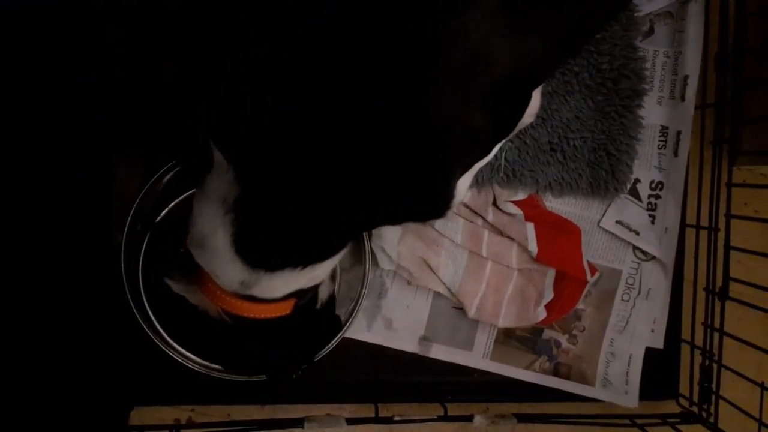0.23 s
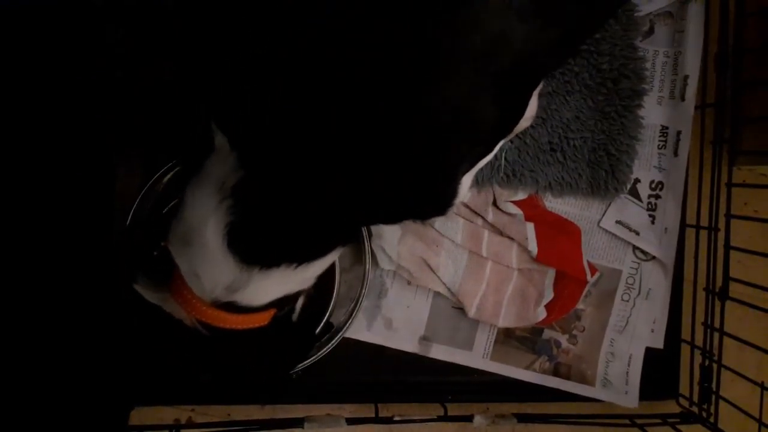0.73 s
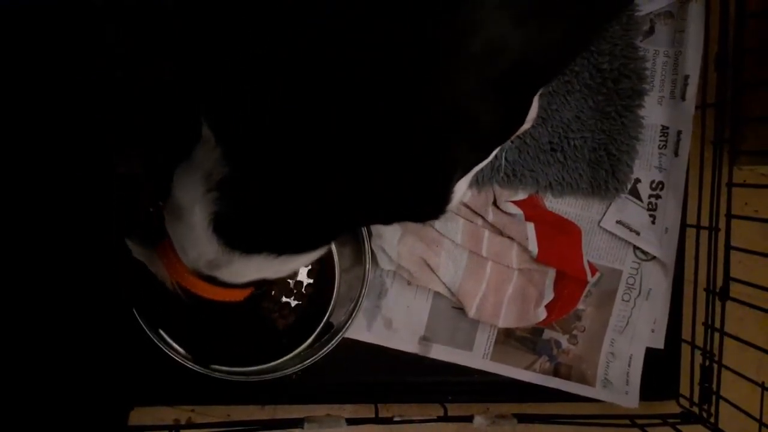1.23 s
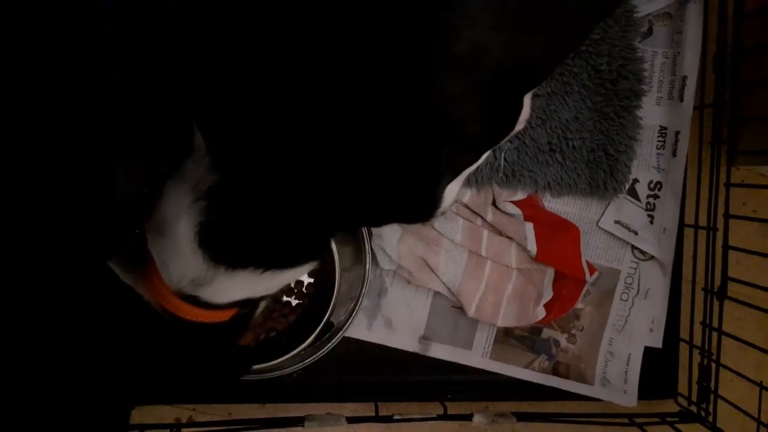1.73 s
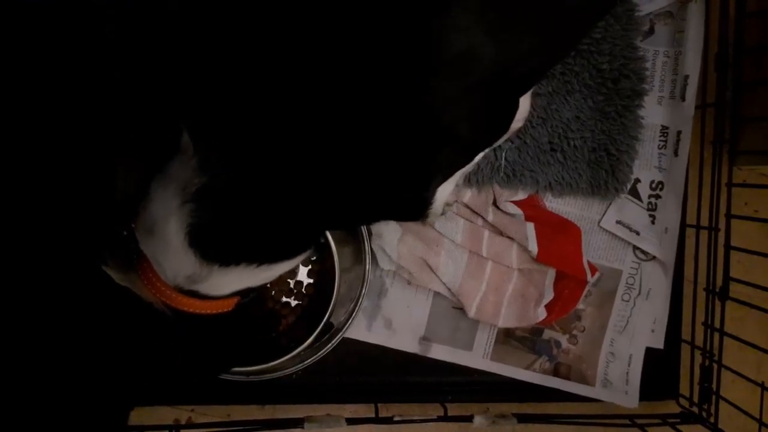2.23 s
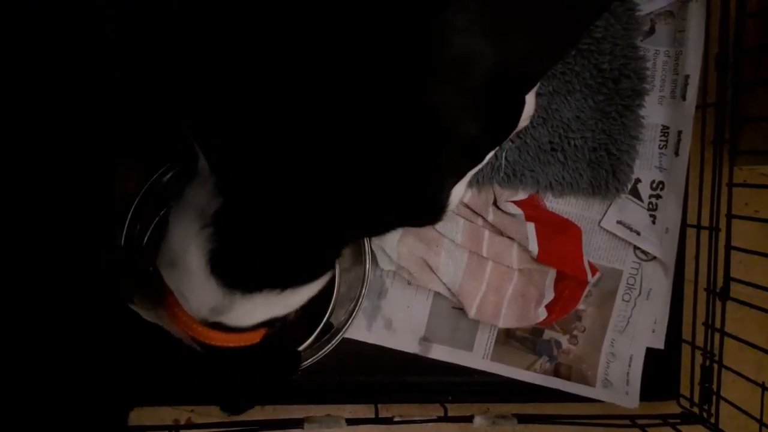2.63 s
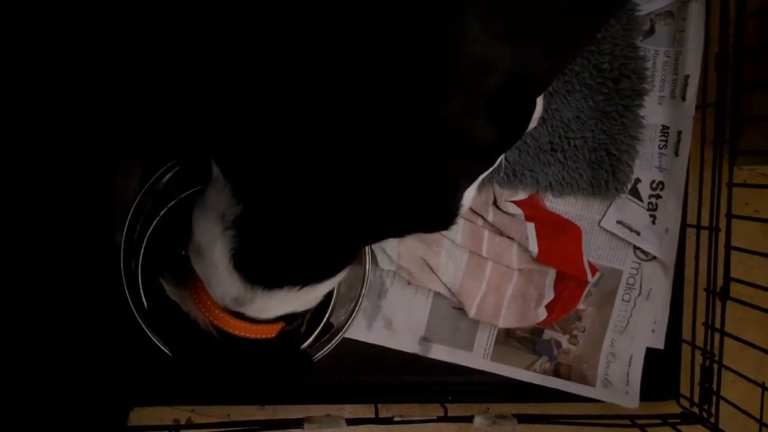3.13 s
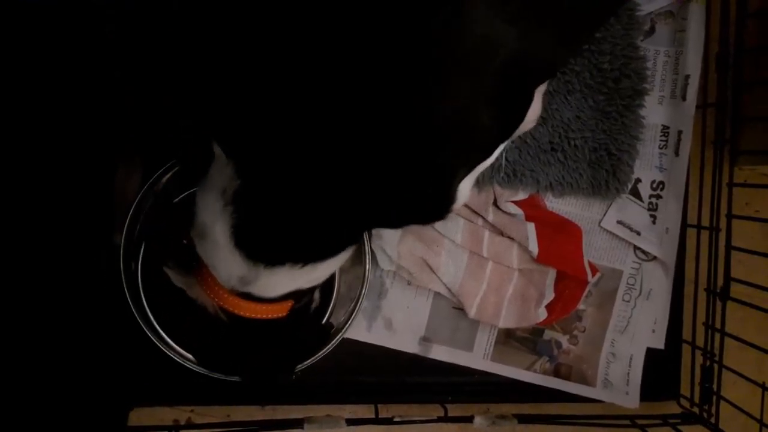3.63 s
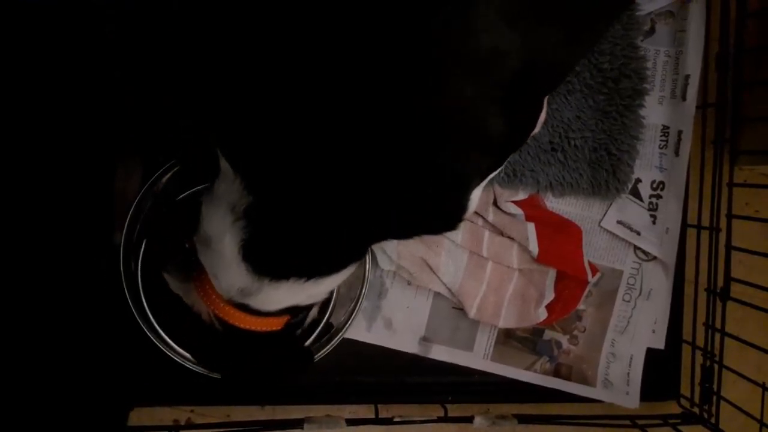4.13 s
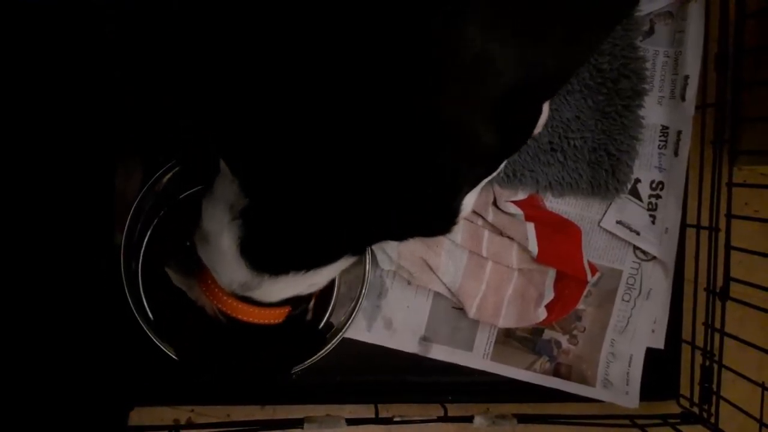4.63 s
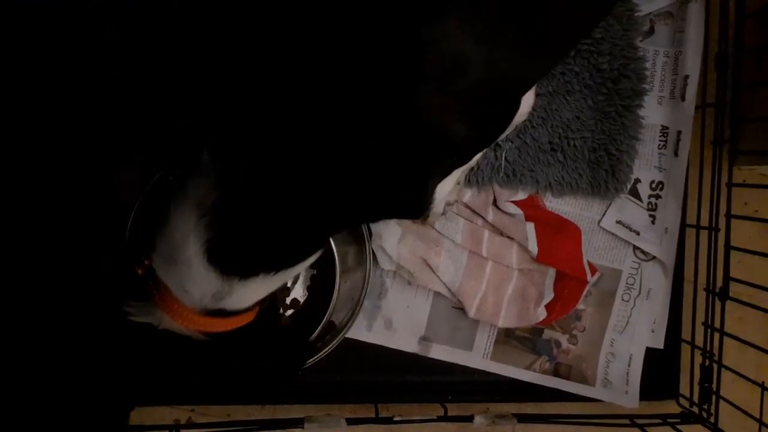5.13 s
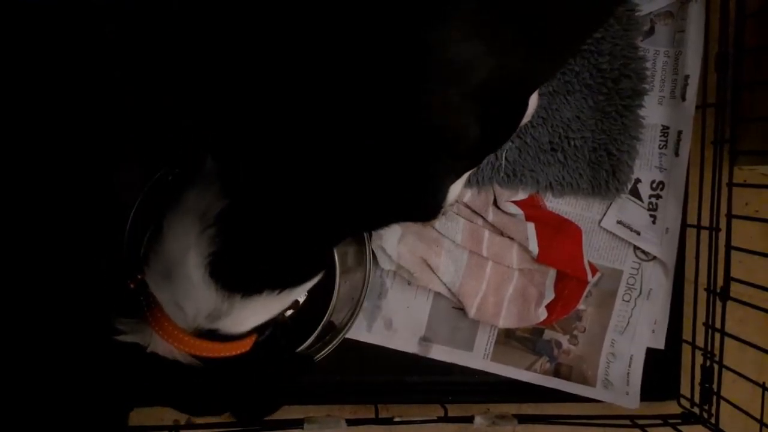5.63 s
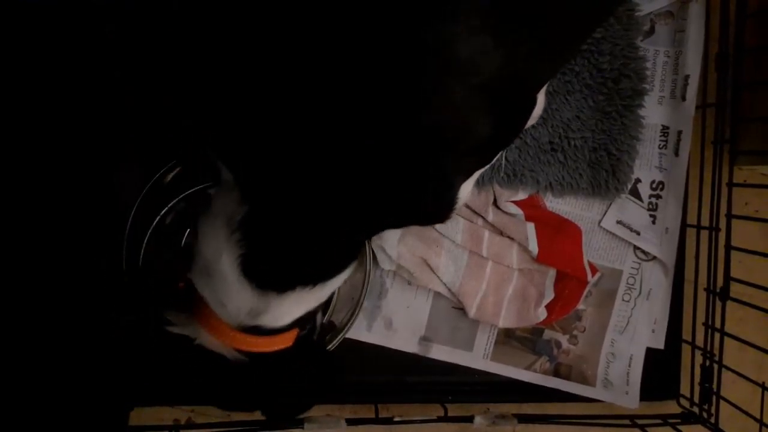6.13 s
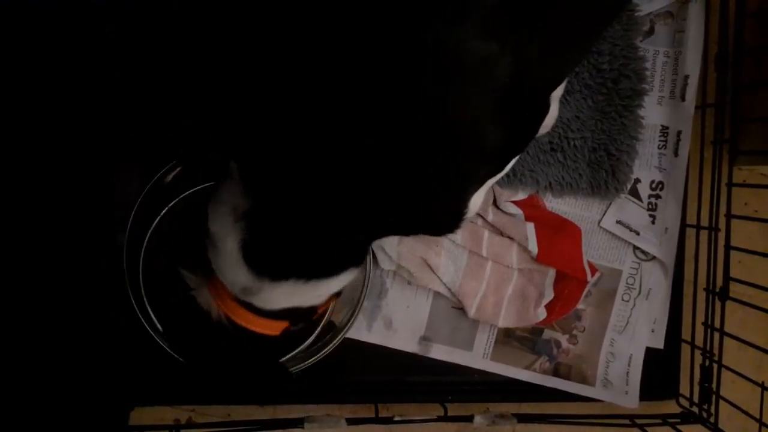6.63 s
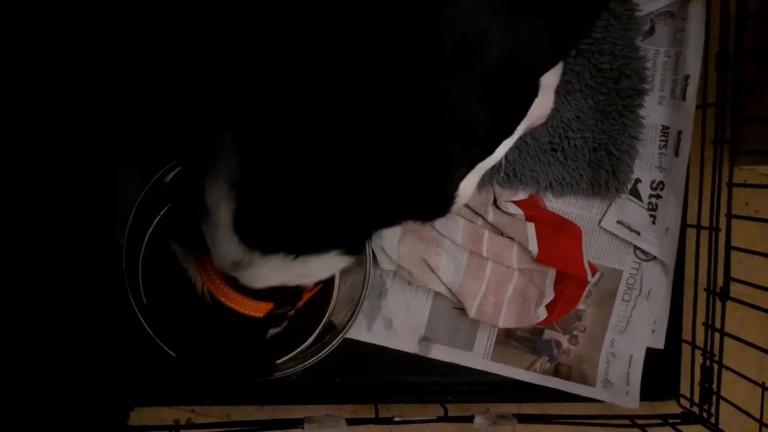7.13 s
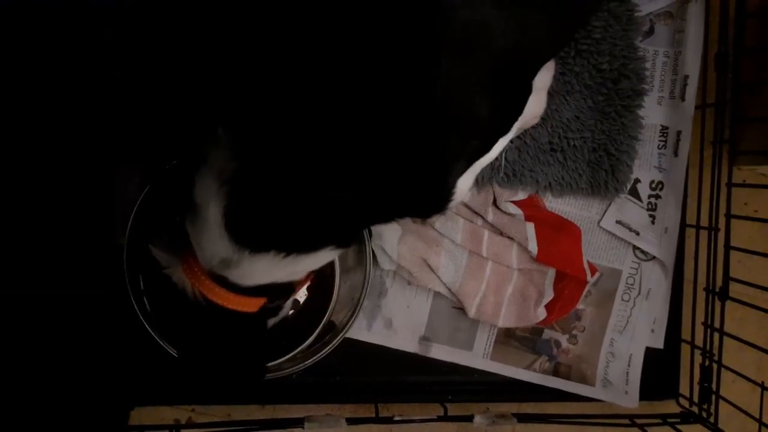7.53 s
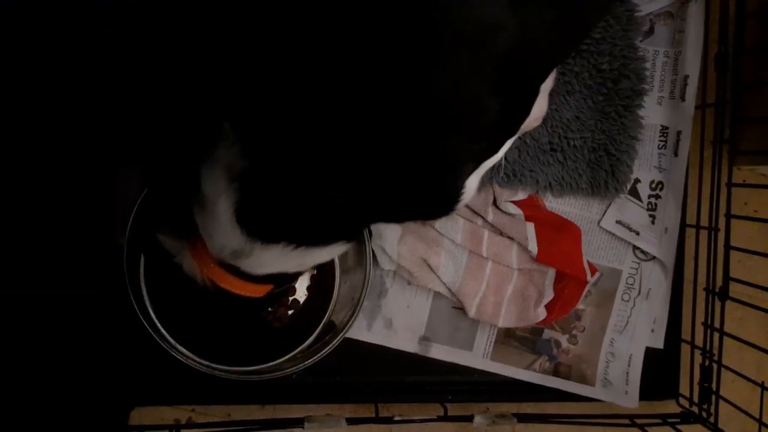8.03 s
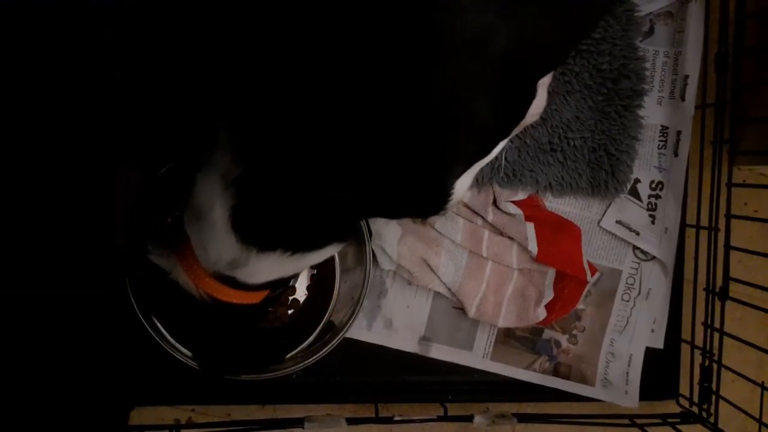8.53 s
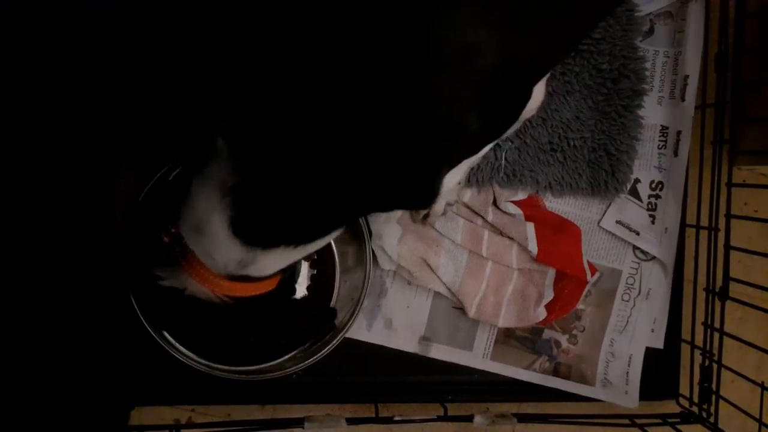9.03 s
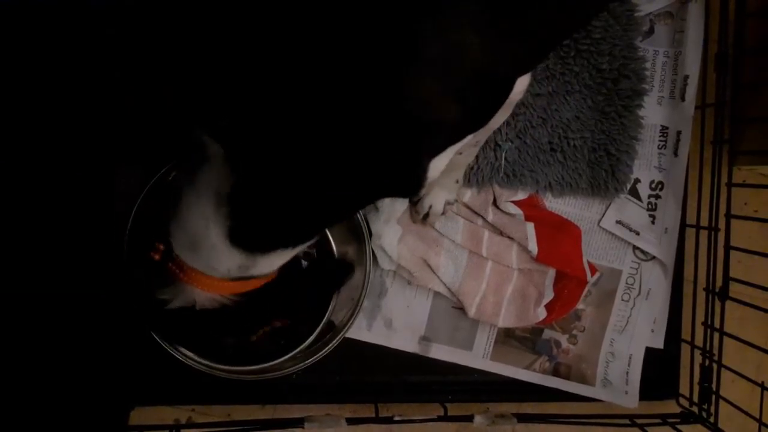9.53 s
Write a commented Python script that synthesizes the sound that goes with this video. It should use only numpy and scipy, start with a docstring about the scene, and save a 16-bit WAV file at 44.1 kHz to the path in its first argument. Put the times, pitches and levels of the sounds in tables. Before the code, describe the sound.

A dog eats kibble from a steel bowl, with wet smacks, licks, crunchy clacks and soft metallic thumps in a small quiet room.

```python
"""In a small live room, a dog in a crate eats kibble from a stainless steel bowl.
Tongue and jaw work in short strokes: lips pop as ringing sines and food squelches as band-passed noise.
Kibble clacks and skitters over the steel, and the nudged bowl booms softly at its lowest modes.
These contacts are clicks sent through coloured, ringing echoes; the hardest bites stand out of the patter.
A faint steady hush of shaped noise lies behind."""
import sys
import numpy as np
from scipy import signal
from scipy.fft import rfft, irfft, next_fast_len
from scipy.io import wavfile
from scipy.ndimage import uniform_filter1d

SR = 44100
rng = np.random.default_rng(int(sys.argv[2]) if len(sys.argv) > 2 else 0)


def wrap_up_sound(samples):
    """Save the sound to the file named by the first command line argument, as 16-bit audio."""
    columns = np.atleast_2d(samples).T
    # keep every value between -1 and 1, then stretch to whole-number steps
    tamed = np.clip(columns, -1, 1)
    steps = np.round(tamed * 32767).astype(np.int16)
    wavfile.write(sys.argv[1], SR, steps)


N = 430857
TIME = np.arange(N) / SR  # seconds
RESPONSE_SIZE = 16384  # samples

# strokes of tongue and jaw, levels relative within each layer: start_s, length_s, bowl_push_db, tongue_db,
# mouth_cavity_hz, stirred_kibble_db, steel_skitter_db
STROKE_TABLE = [(0.0, 0.075, -56, -46.5, 690, -51, -55.5), (0.061, .05, -52.5, -42, 760, -42, -43.5),
                (0.168, 0.12, -53, -55, 726, -52.5, -52), (0.377, .15, -42, -41.5, 653, -42, -44),
                (0.727, 0.097, -44, -42, 700, -45.5, -49.5), (1.06, 0.093, -65, -48, 676, -53, -62),
                (1.17, 0.071, -61, -50, 1080, -60.5, -75), (1.401, 0.18, -50, -44, 654, -47, -56.5),
                (1.524, 0.074, -42, -35, 856, -39, -46), (1.727, 0.17, -42, -62, 670, -59.5, -80),
                (1.98, 0.048, -41.5, -49, 696, -67, -92.5), (2.13, 0.15, -51, -46, 1000, -56.5, -59.5),
                (2.3, .1, -46, -54, 870, -60, -82), (2.483, 0.2, -40, -71, 540, -87.5, -94),
                (2.791, .11, -52, -42.5, 820, -53, -81), (2.915, .13, -51.5, -44.5, 810, -44.5, -51),
                (3.16, 0.18, -59, -46.5, 720, -52.5, -58.5), (3.515, 0.16, -56, -38, 750, -46, -48),
                (3.701, .05, -59, -48, 674, -57, -78), (3.803, 0.066, -56, -40, 735, -49.5, -49.5),
                (3.917, .13, -57, -43, 690, -45.5, -50), (4.135, 0.069, -50, -38, 730, -39, -42.5),
                (4.332, 0.031, -81.5, -51.5, 727, -62, -84), (4.471, 0.099, -46.5, -44.5, 697, -45.5, -50),
                (4.63, 0.057, -75, -58.5, 734, -59, -73.5), (4.841, 0.16, -58, -46, 800, -44, -44.5),
                (5.091, 0.12, -46, -50.5, 744, -60.5, -59.5), (5.597, 0.21, -71, -48, 737, -47.5, -57.5),
                (5.678, 0.17, -39, -35, 875, -36, -44), (6.022, 0.2, -83, -56, 780, -61, -56.5),
                (6.129, 0.12, -51, -35.5, 715, -40.5, -46), (6.396, 0.061, -61, -51, 720, -51.5, -68.5),
                (6.551, 0.19, -59, -50, 774, -65, -80), (6.627, 0.22, -42.5, -39, 710, -44, -44),
                (6.894, 0.14, -40, -36, 645, -38, -45), (7.052, 0.032, -30, -36, 710, -38, -44.5),
                (7.2, 0.14, -34, -33.5, 650, -43.5, -48), (7.392, 0.02, -41.5, -39, 670, -38.5, -42),
                (7.565, 0.14, -46.5, -44, 610, -41, -46), (7.744, 0.097, -66, -49.5, 670, -63, -71),
                (7.913, 0.22, -49, -42, 684, -47.5, -50), (8.238, 0.082, -47.5, -42, 710, -50.5, -51.5),
                (8.298, 0.14, -54, -45, 604, -47.5, -52), (8.571, 0.15, -46, -33.5, 690, -38, -39),
                (8.811, 0.14, -41, -44, 690, -45.5, -52), (8.877, 0.16, -43, -36, 700, -37, -33),
                (9.144, 0.19, -38.5, -36.5, 790, -42, -47), (9.234, 0.18, -36.5, -35.5, 690, -41, -34),
                (9.502, 0.079, -34, -31, 716, -36.5, -38), (9.554, 0.077, -35, -48, 750, -36, -41),
                (9.712, .05, -43.5, -49, 727, -56, -45.5)]
# between strokes the muzzle never quite rests
IDLE_PUSH_DB, IDLE_TONGUE_DB, IDLE_STIR_DB, IDLE_SKITTER_DB = -71.5, -68, -77.5, -87.5


def mouth(times, pop_db, tongue_db, scatter=0.18, gain_db=-15.0):
    """Loud smacks at the bites, and a patter of small pops around the cavity's pitch between them."""
    # colour of the pops: point_hz, relative_level_db
    pop_colour = [(150, -32.5), (350, -10.5), (470, 2), (620, 3), (950, 0.5), (1300, 1), (1700, -7),
                  (3000, -63), (8000, -61)]
    licking = effort(tongue_db, IDLE_TONGUE_DB, crest_share=0.19, swell_db=-2, ease_db=6,
                     release_db_per_s=281)
    patter = licking * grains(per_s=150, spread_db=1.5, steady_s=.04)
    pops = np.zeros(N)
    for s, db in zip(times, pop_db):
        add(pops, s, from_db(db) * pop(cavity_hz(s), cycles=1.0))
    pitches_hz = cavity_hz(TIME) * np.exp(scatter * rng.standard_normal(N))
    for i in np.flatnonzero(patter):
        add(pops, i / SR, patter[i] * pop(pitches_hz[i], cycles=2.0))
    heard = radiate(pops, pop_colour, t60=0.24, early_s=0.0054, early_share=0.35, pan_db=2.5)
    return from_db(gain_db) * heard


def pop(pitch_hz, cycles):
    """A wet seal breaks and the mouth cavity rings for a moment, fading by 1/e in this many cycles."""
    t = np.arange(SR // 50) / SR
    ring = np.sin(2 * np.pi * pitch_hz * t)
    return unit_energy(ring * np.exp(-t * pitch_hz / cycles))


def cavity_hz(s):
    """Pitch of the mouth cavity, which changes shape from the middle of one stroke to the next."""
    start, length, _, _, hz, _, _ = np.transpose(STROKE_TABLE)
    return np.interp(s, start + length / 2, hz)


def jaws(width_share=0.37):
    """Food is squeezed in the closing mouth: a short wet rush, pitched by the pocket it escapes from."""
    # gulps, squelches and fizzing saliva: start_s, level_db, pitch_hz, fade_s (to 1/e)
    squelch_table = [(1.074, -48.5, 2100, 0.04), (1.2, -54, 1300, 0.03), (1.54, -36.5, 12900, 0.02),
                     (1.548, -28, 1230, 0.031), (1.784, -43, 280, 0.12), (2.118, -47, 1810, 0.093),
                     (2.557, -44, 239, 0.046), (2.753, -36.5, 1800, 0.045), (2.754, -39.5, 2370, 0.042),
                     (4.176, -43, 10800, 0.025), (4.67, -50.5, 740, 0.072), (5.22, -43.5, 714, 0.013),
                     (5.575, -47.5, 720, 0.099), (5.74, -39.5, 12500, 0.02), (5.746, -33.5, 273, 0.16),
                     (6.084, -37.5, 930, .025), (6.18, -34, 2060, 0.034), (6.215, -26.5, 251, 0.031),
                     (6.257, -24, 210, 0.011), (9.569, -46, 13400, 0.019)]
    t = np.arange(SR // 5) / SR
    out = np.zeros(N)
    for s, db, hz, fade_s in squelch_table:
        edges_hz = hz * np.exp([-width_share / 2, width_share / 2])
        cavity = signal.butter(2, edges_hz, "band", fs=SR, output="sos")
        fade = np.exp(-t / fade_s)
        rush = signal.sosfilt(cavity, rng.standard_normal(len(t)) * fade)
        # a longer fade carries more energy
        add(out, s, from_db(db) * unit_energy(rush) * np.linalg.norm(fade))
    echoes = room(t60=0.25, early_s=0.0032, early_share=0.97)
    return signal.oaconvolve(out[None], echoes, axes=1)[:, :N]


def kibble(times, clack_db, stir_db):
    """Pellets knock on each other and crack between teeth."""
    # colour of the clacks: point_hz, relative_level_db
    clack_colour = [(500, -32.5), (1000, -3.5), (1400, 7.5), (2000, 1.5), (3000, 1), (3900, -7),
                    (5200, -24), (9000, -16.5), (15500, -30.5)]
    stirring = effort(stir_db, IDLE_STIR_DB, crest_share=0.26, swell_db=8, ease_db=7.5,
                      release_db_per_s=378)
    force = stirring * grains(per_s=220, spread_db=5.5, steady_s=.045)
    force += blows(times, clack_db, chatter_s=0.004, first_share=.55)
    return radiate(force, clack_colour, t60=0.24, early_s=0.011, early_share=0.34, pan_db=-1.5)


def steel(times, clink_db, skitter_db):
    """Hard pellets strike and skitter over the bare metal."""
    # colour of the clinks: point_hz, relative_level_db
    clink_colour = [(1500, -30.5), (3000, -7), (3800, 0), (5100, 2), (5700, 3), (6300, -1.5), (7300, -6),
                    (8100, -2), (8900, -3.5), (10100, -18), (12500, -17), (15700, -23.5)]
    skittering = effort(skitter_db, IDLE_SKITTER_DB, crest_share=.3, swell_db=6, ease_db=10,
                        release_db_per_s=497)
    force = skittering * grains(per_s=300, spread_db=6, steady_s=0.083)
    force += blows(times, clink_db, chatter_s=0.0026, first_share=0.36)
    return radiate(force, clink_colour, t60=0.2, early_s=0.0065, early_share=0.23, pan_db=-0.9)


def bowl_thumps(times, thump_db, push_db):
    """The bowl is knocked and judders over the floor."""
    # colour of the thumps: point_hz, relative_level_db
    thump_colour = [(30, -30.5), (60, -23.5), (100, -15), (150, -17), (215, -12), (320, -0.5), (430, -2),
                    (520, -14), (800, -33), (2000, -73)]
    push = effort(push_db, IDLE_PUSH_DB, crest_share=0.7, swell_db=6, ease_db=8.5,
                  release_db_per_s=260)
    force = push * grains(per_s=260, spread_db=0, steady_s=0.017)
    force += blows(times, thump_db, chatter_s=0.0092, first_share=0.96)
    return radiate(force, thump_colour, t60=0.24, early_s=0.0083, early_share=0.55, pan_db=0.55)


def effort(levels_db, idle_db, crest_share, swell_db, ease_db, release_db_per_s, attack_db_per_s=1500):
    """Every stroke sets in quickly, slides to its crest level, eases off and dies away: a gain per sample."""
    gain = np.full(N, from_db(idle_db))
    lead_s, tail_s = .05, .3
    for (start, length, *_), db in zip(STROKE_TABLE, levels_db):
        crest_s = np.clip(crest_share, .05, .95) * length
        corners_s = [-lead_s, 0, crest_s, length, length + tail_s]
        # a negative swell_db sets in above the crest level
        lead_db = -swell_db - attack_db_per_s * lead_s
        tail_db = -ease_db - release_db_per_s * tail_s
        corners_db = [lead_db, -swell_db, 0, -ease_db, tail_db]
        t = TIME[(TIME > start - lead_s) & (TIME < start + length + tail_s)]
        add(gain, t[0], from_db(db + np.interp(t - start, corners_s, corners_db)))
    return gain


def grains(per_s, spread_db, steady_s):
    """Random tiny contacts of uneven size that share a steady supply of power."""
    at = np.flatnonzero(rng.random(N) < per_s / SR)
    sign, size = rng.standard_normal((len(at), 2)).T
    clicks = np.zeros(N)
    clicks[at] = np.sign(sign) * from_db(spread_db * size)
    power = uniform_filter1d(clicks ** 2, int(steady_s * SR))
    return clicks / np.sqrt(np.maximum(power, 1e-9))


def blows(times, levels_db, chatter_s, first_share):
    """Each blow is one firm contact and a dying chatter of small rebounds, which share its energy."""
    t = np.arange(SR // 20) / SR
    share = np.clip(first_share, 0, 1)
    force = np.zeros(N)
    for s, db in zip(times, levels_db):
        # cubing the noise lets a few rebounds stand out
        rebounds = rng.standard_normal(len(t)) ** 3 * np.exp(-t / chatter_s)
        burst = np.sqrt(1 - share) * unit_energy(rebounds)
        burst[0] = np.sqrt(share)
        add(force, s, from_db(db) * burst)
    return force


def radiate(force, colour, t60, early_s, early_share, pan_db, mode_spread_db=-0.5, own_paths=1.5,
            colour_spread_db=3.33, count=4):
    """Contacts land on changing spots of the bowl, each with its own mode strengths, colour and echoes."""
    # the bowl's modes: centre_hz, width_hz, level_db over the broad response, before each spot's variation
    bowl_modes = [(274.5, 27, 11), (325.7, 11.6, 15), (446, 9.1, 3), (535, 7.7, 4), (671, 13, 1),
                  (754, 5.9, 6.5), (1063, 10, 6), (1195, 19, 6), (1361, 43, 6.5), (2270, 17, 4),
                  (3100, 26, -4.5), (4095, 25, 6), (4440, 35, 4), (4674, 27, 11), (6130, 88, 3.5),
                  (6560, 38, 1.5), (7350, 19, -2.5)]
    hz = np.fft.rfftfreq(RESPONSE_SIZE, 1 / SR)
    centre_hz, width_hz, mode_db = np.transpose(bowl_modes)
    resonances = 1 / (1 + 2j * (hz - centre_hz[:, None]) / width_hz[:, None])
    shared = room(t60, early_s, early_share)
    stay = SR // 40  # samples before the spot is drawn anew
    spot = np.repeat(rng.integers(count, size=N // stay + 1), stay)[:N]
    out = np.zeros((2, N), np.float32)
    for k in range(count):
        varied_mode_db = mode_db + mode_spread_db * rng.standard_normal(len(bowl_modes))
        strengths = from_db(varied_mode_db) - 1
        modes = 1 + (strengths[:, None] * resonances).sum(axis=0)
        # pellets differ in size and hardness, so each spot sounds a little duller or brighter here and there
        points_hz, colour_db = np.transpose(colour)
        varied_db = colour_db + colour_spread_db * rng.standard_normal(len(colour))
        tone = causal(gain_at(np.c_[points_hz, varied_db], hz))
        echoes = shared + own_paths * room(t60, early_s, early_share)
        response = unit_energy(irfft(rfft(echoes) * tone * modes))
        contacts = np.float32(force * (spot == k))
        out += signal.oaconvolve(contacts[None], np.float32(response), axes=1)[:, :N]
    # positive pan_db leans left
    return out * from_db([[pan_db / 2], [-pan_db / 2]])


def room(t60, early_s, early_share, even_hz=24):
    """Echoes for left and right: a quick flurry from bowl and crate, then the room's tail."""
    t = np.arange(RESPONSE_SIZE) / SR
    early, late = rng.standard_normal((2, 2, RESPONSE_SIZE))
    share = np.clip(early_share, 0, 1)
    echoes = np.sqrt(share) * unit_energy(early * np.exp(-t / early_s))
    echoes += np.sqrt(1 - share) * unit_energy(late * from_db(-60 * t / t60))
    # the echoes are evened, so that no stretch of pitch is much favoured
    spectrum = rfft(echoes)
    power = uniform_filter1d(np.abs(spectrum) ** 2, int(2 * even_hz * RESPONSE_SIZE / SR))
    evened = irfft(spectrum / np.sqrt(power))
    # the end is silenced, as evening can wrap sound around to it
    return unit_energy(evened * (t < t[-1] * .85))


def causal(gain):
    """The minimum-phase filter with this gain: nothing sounds before the contact."""
    cepstrum = irfft(np.log(gain))
    cepstrum[1:RESPONSE_SIZE // 2] *= 2
    cepstrum[RESPONSE_SIZE // 2 + 1:] = 0
    return np.exp(rfft(cepstrum))


def air():
    """The still air of the room: a faint steady hush of noise, independent left and right."""
    # colour of the hush: point_hz, relative_level_db
    air_colour = [(20, -2.5), (120, 5), (300, 6.5), (700, -11), (1500, -3.5), (3000, -15.5), (14000, -12),
                  (16000, -17)]
    level_db = -67  # RMS
    size = next_fast_len(N)
    white = rfft(rng.standard_normal((2, size)))
    gain = gain_at(air_colour, np.fft.rfftfreq(size, 1 / SR))
    noise = irfft(white * gain, size)[:, :N]
    return from_db(level_db) * noise / noise.std()


def gain_at(spectrum, hz):
    """Gain of a spectrum, its decibels straight between its points on a log frequency axis."""
    points_hz, level_db = np.transpose(spectrum)
    return from_db(np.interp(np.log(hz + 1), np.log(points_hz), level_db))


def add(track, s, sound):
    """Mix a short sound in at a time in seconds."""
    start = max(int(s * SR), 0)
    track[start:start + len(sound)] += sound[:max(N - start, 0)]


def unit_energy(x):
    """Scale each channel to an energy of one."""
    return x / np.sqrt(np.sum(x ** 2, axis=-1, keepdims=True) + 1e-20)


def from_db(db):
    """Decibels to gain."""
    return np.exp(np.asarray(db) * (np.log(10) / 20))


def scene():
    """Strokes and bites drive mouth, food and bowl together."""
    # the hardest bites and knocks, levels relative within each layer: start_s, bowl_thump_db, mouth_pop_db,
    # kibble_clack_db, steel_clink_db
    bite_table = [(0.065, -15, -1.5, -9, -5.5), (0.084, -22, 0, -3.5, 10), (0.236, -22, -10.5, -16.5, -8.5),
                  (0.433, -21, 4.5, -10, -15), (0.469, 2.5, 8, -2.5, -13), (0.75, -5.5, -17.5, -32, -24),
                  (0.82, -7, -5, -16.5, -10), (0.96, -43, -24.5, -52, -40.5), (1.071, -46, -19, -30, -24),
                  (1.45, -29, -2.5, -11, -8.5), (1.479, -30, 2, -11.5, -22), (1.54, -18, 0.5, -5.5, -19),
                  (1.549, -3, 12, -3, 1), (1.575, -1, -2, -13, -10), (1.763, -12, -25.5, -22, -26.5),
                  (2.045, -16, -11.5, -36.5, -57.5), (2.243, -17, -5, -35, -46),
                  (2.365, -34, -15, -20.5, -26.5), (2.556, -5.5, -20, -38.5, -52),
                  (2.754, -9.5, -11.5, -28, -53.5), (2.853, -11, -5, -43, -27),
                  (3.025, -16.5, -4, -10, -10), (3.225, -8.5, -2.5, -11, -9), (3.262, -11, -2.5, -6.5, -20),
                  (3.285, -38, -19, -15, -14), (3.547, -15, -13, -32, -20), (3.575, -24, -2, -7, -10),
                  (3.81, -10, -5, -19, -29), (3.996, -14.5, -19, -12.5, -27), (4.156, -9, -5, -17, -10),
                  (4.531, -17, -5.5, -25, -31), (4.868, -11.5, -12, -13, -8), (4.982, -38, -8, -15, -2),
                  (5.006, -31, -7.5, -8.5, -2.5), (5.1, -9, -13.5, -20, -19), (5.424, -25, -25, -38, -46),
                  (5.634, -52, -13, -38.5, -16), (5.678, -40, -8, -6.5, -14.5), (5.747, 2.5, -1, -2, -6.5),
                  (5.823, 4, -22, -25, -38), (5.878, -2.5, -26, -30, -31), (5.933, -7.5, -44, -49, -55),
                  (6.084, -45, -4.5, -19.5, -29), (6.179, -1, 6, -13, -11.5), (6.258, -15, -10, -7, -22),
                  (6.645, -21, -29, -39, -4), (6.704, 3.5, -11, -17, -17), (6.778, -13, -6, -14, -1),
                  (6.914, -15, -15, -12, -9.5), (6.984, -6, -4, -9.5, -10), (7.078, 4, -16, -24, -28),
                  (7.112, -15, -27, -18, -8.5), (7.213, -2, -1, -4.5, -20), (7.294, -18, 5, -7.5, -9.5),
                  (7.563, -18, -3.5, -20, -34), (7.575, -18, -4, -15, -29), (7.62, -31, -10, -25, -6),
                  (7.66, -36, 0.5, -15, -5.5), (7.764, -16, -12, -16, -13.5), (8.031, -21, -21, -23, -0.5),
                  (8.035, -8, 1.5, -3.5, -4), (8.244, -20, -9, -19.5, -33), (8.305, -22, 0.5, -9.5, -9),
                  (8.379, -29, 1.5, -13, -25), (8.591, -29, -14, -16, 2.5), (8.686, -7.5, 10.5, -0.5, -8.5),
                  (8.734, -40, -25, -9.5, -4), (8.822, -13, -3, -12.5, -34), (8.857, -13, 4, -8.5, -26),
                  (8.911, -1.5, 5, 4.5, 8), (8.95, -4, 5.5, -10.5, -1), (9.003, -6.5, -1.5, -6, -4.5),
                  (9.193, -24, -7, -2.5, -12), (9.254, -1, 1, -3.5, 3), (9.285, 4.5, 8, -10, 0),
                  (9.302, -1, -8, -10, -2.5), (9.357, -19, -5, -1, 2), (9.568, -1.5, 7.5, -2, -6),
                  (9.614, -3, 2.5, -1, -2.5)]
    times, thump_db, pop_db, clack_db, clink_db = np.transpose(bite_table)
    _, _, push_db, tongue_db, _, stir_db, skitter_db = np.transpose(STROKE_TABLE)
    dog = mouth(times, pop_db, tongue_db) + jaws()
    food = kibble(times, clack_db, stir_db) + steel(times, clink_db, skitter_db)
    return dog + food + bowl_thumps(times, thump_db, push_db) + air()


def record(dry):
    """The top is cut steeply by an elliptic low-pass."""
    cutoff_hz, ripple_db, rejection_db = 15900, .1, 80
    low_pass = signal.ellip(12, ripple_db, rejection_db, cutoff_hz, fs=SR, output="sos")
    return signal.sosfilt(low_pass, dry)


dry = scene()
out = record(dry)
wrap_up_sound(out)
```